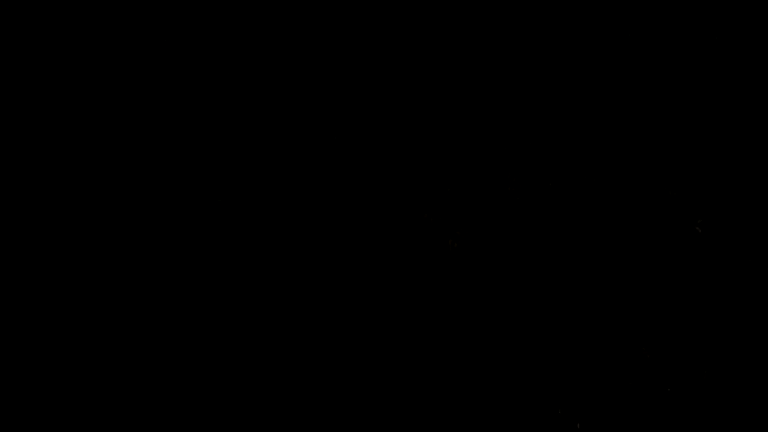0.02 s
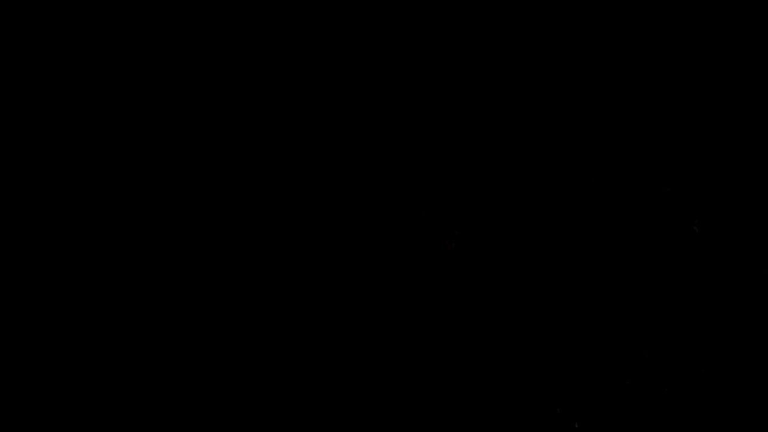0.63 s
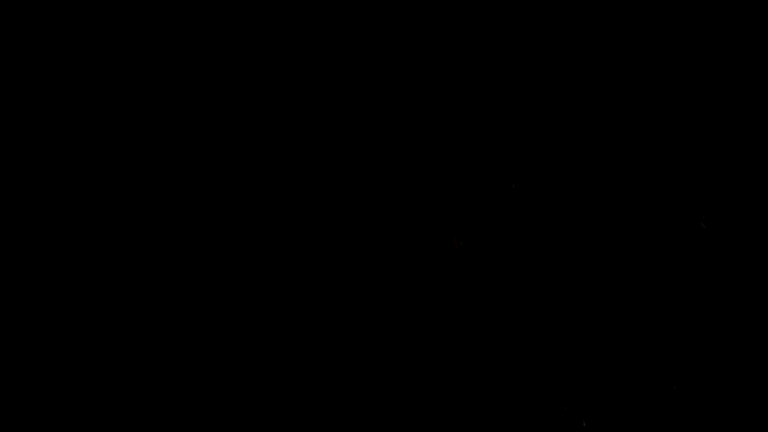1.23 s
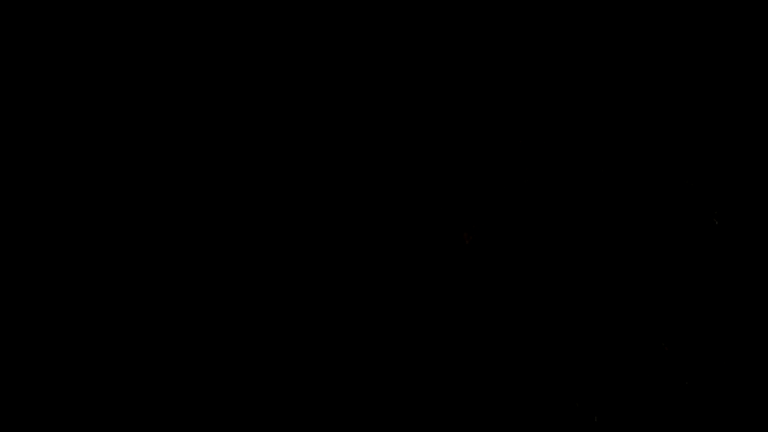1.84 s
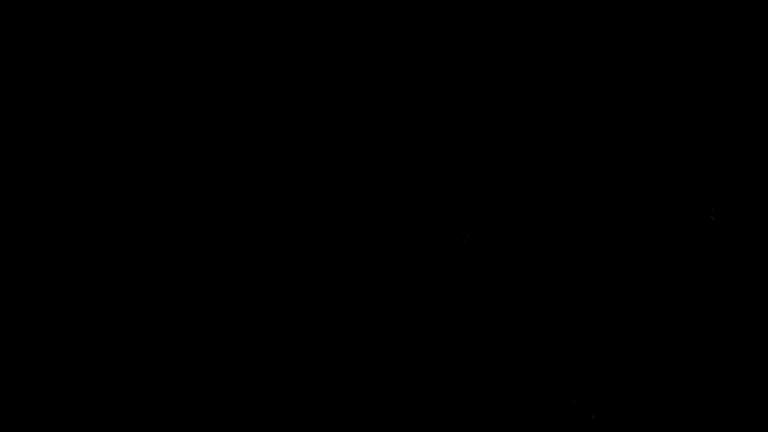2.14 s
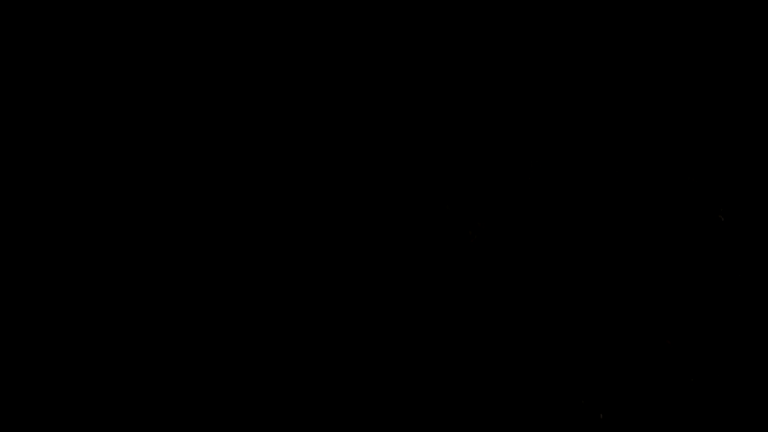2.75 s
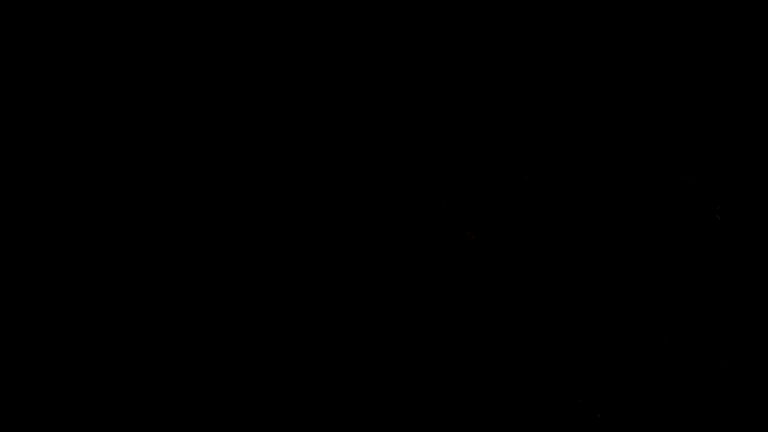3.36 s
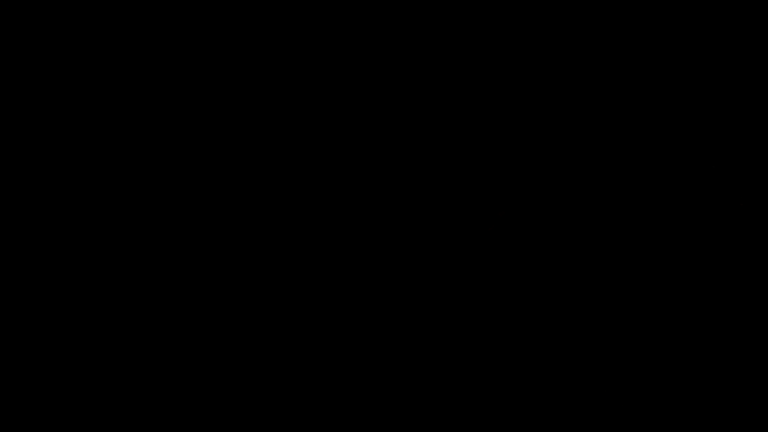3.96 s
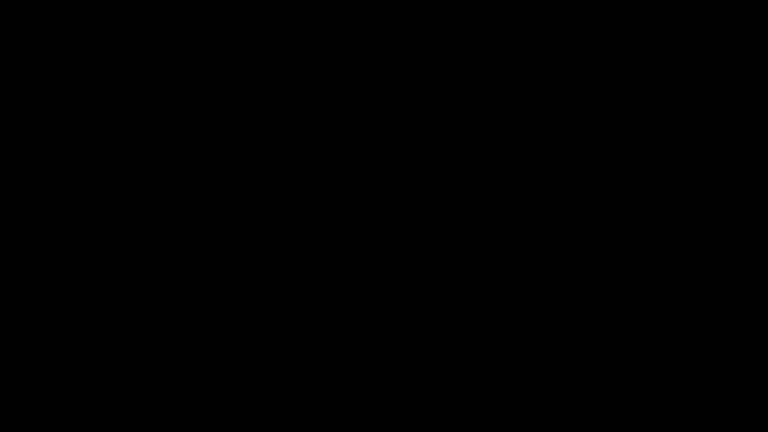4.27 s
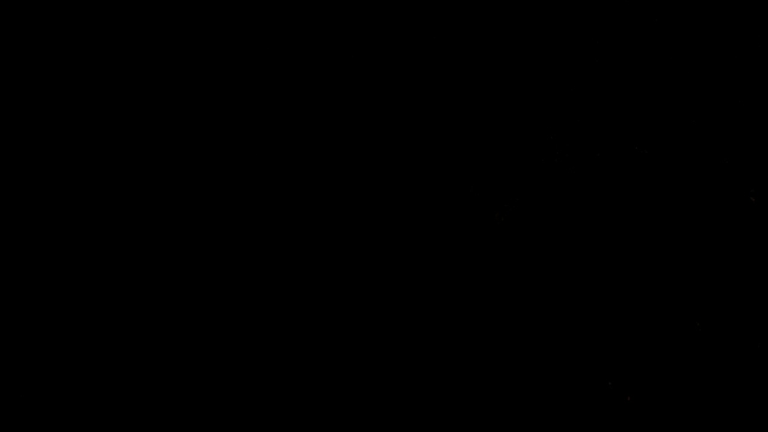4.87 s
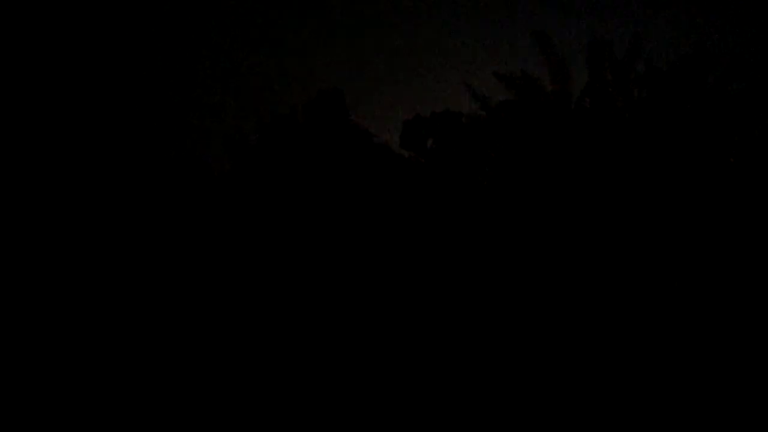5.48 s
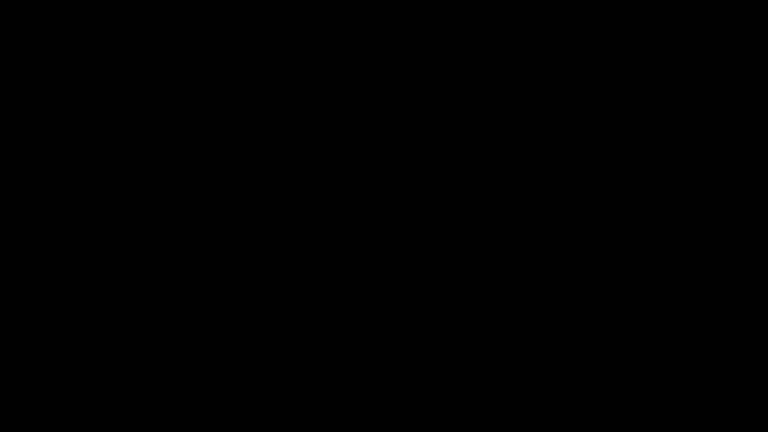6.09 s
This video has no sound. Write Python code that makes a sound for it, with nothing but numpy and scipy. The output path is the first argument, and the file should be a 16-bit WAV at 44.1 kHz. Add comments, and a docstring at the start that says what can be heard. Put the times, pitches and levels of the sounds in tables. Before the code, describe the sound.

Light rain falls in a garden at night for about six seconds, a steady, wide stereo hiss with fine drops ticking on nearby leaves. A faint low rumble lies underneath from the start. Between 0.3 and 1 second, close drips click, splash and plop hollowly into a puddle. At about 1.6 seconds distant thunder rolls in with low peals and short, muffled booms, the strongest cluster coming around 2.5 to 2.9 seconds. Single bright drips continue throughout, with small splashes near 1.8, 3.1 and 3.4 seconds and a plop near 3.1. The thunder thuds again at 4.2 seconds, then grows fuller and nearer, with a long peal and several booms from 4.9 to 5.7 seconds. Two close splashes with sharp drips and plops land around 5.9 to 6 seconds, while the rain and thunder are still going.

```python
"""Light night rain in a garden, while distant thunder rolls in and slowly draws nearer.
Countless far drops blend into a hiss, and fine drops tick on leaves. Close by, gathered water
drips, splashes and plops into a puddle. The thunder is low noise: a rumble, long peals, short booms.
Two microphone ports (small openings) pick it all up, and a stereo widener spreads it out."""
import sys
import numpy as np
from scipy import signal
from scipy.fft import rfft, irfft
from scipy.io import wavfile
from scipy.ndimage import uniform_filter1d

SR = 44100
rng = np.random.default_rng(int(sys.argv[2]) if len(sys.argv) > 2 else 0)


def to_wav(s):
    """Save 16-bit WAV."""
    ch = np.atleast_2d(s).T  # columns
    pcm = np.round(np.clip(ch, -1, 1) * 32767)  # PCM
    wavfile.write(sys.argv[1], SR, pcm.astype(np.int16))


N = 269451
T = np.arange(N) / SR
HZ = np.fft.rfftfreq(N, 1 / SR)

# Levels are relative. A t60 is the time a sound takes to fade by 60 dB.
# tone of far and of nearer thunder: f/Hz, level/dB
FAR_TONE = [(25, -75), (55, -30), (85, -7), (130, -3.5), (200, 0.5), (280, 6.5), (400, -2.5), (600, -12.5),
            (900, -32), (2000, -88)]
NEAR_TONE = [(25, -53), (55, -37), (85, -15.5), (130, 1.5), (200, -2), (290, -2), (400, -5.5), (600, -6),
             (780, -13.5), (1100, -30), (2500, -61)]
# the unbroken rumble: t/s, level/dB, nearness/0-1
RUMBLE = [(0, -54.5, 0.34), (1.45, -52.5, 0.3), (1.7, -45.5, 0), (3.9, -42, 0.36), (4.9, -39, 0.89),
          (6.11, -36, 0.82)]
# peals of thunder: t/s at the loudest point, level/dB, t60/s, nearness/0-1
PEALS = [(1.635, -40, 2.1, 0.3), (1.93, -41.5, 1.9, 0), (2.54, -36, 1.6, 0.04), (2.8, -37.5, 1.5, 0.36),
         (3.42, -41, 1.2, 0.6), (3.59, -39, 0.79, 1), (4.1, -42, .5, 0.3), (4.19, -31.5, 0.4, 0.9),
         (4.46, -40, 0.93, .95), (4.87, -34, 4.7, 0.47), (5.11, -37.5, 0.56, 0.4), (5.38, -33, 3.1, 0.8),
         (5.73, -38, 1.1, 1)]
# booms within the thunder: t/s at the loudest point, level/dB, f/Hz, width/octaves, length/s
BOOMS = [(1.613, -28, 290, 0.36, 0.058), (1.622, -44, 76, .36, .1), (1.653, -31, 233, .5, 0.053),
         (1.71, -42, 110, .5, 0.16), (1.867, -48, 80, .3, 0.16), (2.016, -30, 285, 0.28, 0.058),
         (2.423, -30, 312, 0.85, 0.048), (2.55, -24.5, 300, 0.65, .065), (2.694, -18, 261.5, 0.29, 0.045),
         (2.746, -25.5, 210, 0.21, 0.064), (2.8, -34, 217, .5, 0.095), (2.81, -51, 70, .35, .08),
         (2.87, -26.5, 250, 0.51, 0.068), (3.415, -35, 124, 0.28, .08), (4.186, -23.5, 141, 0.28, 0.052),
         (4.228, -30, 310, 0.74, 0.048), (4.394, -30.5, 282, .3, 0.059), (4.577, -29, 278, .3, .045),
         (4.617, -28, 155, 0.43, .07), (5.117, -25, 308, 0.22, 0.053), (5.143, -34.5, 135, 0.3, 0.0603),
         (5.191, -24.5, 146, 0.25, .05), (5.358, -25.5, 210, 0.29, 0.0507), (5.384, -29, 137, .32, .055),
         (5.399, -27.5, 207, 0.54, .05), (5.409, -31.5, 620, 0.33, 0.048), (5.468, -28.5, 304, .25, 0.074),
         (5.555, -30.5, 138, .45, .05), (5.581, -28, 340, 0.51, 0.051), (5.718, -46, 82, .28, .11),
         (5.725, -31, 560, 0.57, 0.048), (5.975, -30, 155, 0.34, .05)]
# tone of the far rain: f/Hz, level/dB
RAIN_TONE = [(30, -66), (70, -22), (140, -6.5), (370, 0.5), (550, -1), (750, 0.5), (1050, -3), (1450, -7.5),
             (2200, -3), (2800, -3.5), (3600, -6), (4500, -11), (7500, -9.5), (11000, -10.5), (14000, -19),
             (15500, -17)]
# strength of the far rain: t/s, level/dB
RAIN_LEVEL = [(0, -37), (.7, -37.5), (1.2, -37.5), (1.8, -37), (2.25, -37.5), (2.7, -37), (3.3, -38),
              (3.8, -38), (4.3, -37.5), (5.1, -37), (5.7, -38.5), (6.11, -37.5)]
# hollow plops in a puddle: t/s, level/dB, f/Hz, t60/s
PLOPS = [(.556, -39, 875, .1), (.574, -29, 757, 0.12), (.604, -40, 896, .1), (.606, -38, 1165, .1),
         (1.02, -32.5, 770, 0.073), (3.148, -36, 634, 0.083), (3.166, -33, 803, 0.1),
         (3.168, -28.5, 617, 0.08), (5.916, -27, 3490, 0.033), (5.926, -37, 3180, 0.045),
         (5.988, -43, 2150, .05), (5.993, -33, 680, 0.068)]
# splashes: t/s, spray level/dB, spray tilt/dB per octave, spray t60/s, slap level/dB
SPLASHES = [(.402, -37.5, -6.5, 0.46, -40), (0.479, -31, -2.5, 0.37, -40), (.552, -37, -5.5, 0.35, -30.5),
            (.755, -36.5, -2, 0.25, -52), (1.824, -36, -6, 0.41, -31), (3.142, -33, -6, 0.33, -29.5),
            (3.415, -34, -8, 0.56, -31.5), (4.19, -41, -3, .3, -50), (4.26, -36, -3, 0.18, -55),
            (5.914, -29.5, -6, 0.26, -31.5), (5.98, -33, -6, 0.22, -31)]
# tone of a splash's spray (before its tilt) and of the puddle's slap: f/Hz, level/dB
SPRAY_TONE = [(30, -60), (120, -47), (400, -5.5), (750, -17), (1400, -27), (2300, 6.5), (3500, -2),
              (7500, 1.5), (11000, 6.5), (15500, -34)]
SLAP_TONE = [(100, -39), (350, 8.5), (700, -7), (1200, 0), (2200, -10), (3500, -13), (8000, -43)]
# the clearest drips: t/s, level/dB, f/Hz, splatter t60/s, width/octaves
DRIPS = [(0.324, -31, 10000, .014, 0.8), (.4094, -32, 8800, .03, .25), (0.4853, -20, 9100, .035, 0.4),
         (0.4985, -28, 4600, .12, 0.9), (.529, -31, 9400, .025, .3), (0.5525, -29, 6000, .06, .9),
         (0.6713, -21.5, 7200, 0.043, 0.85), (1.028, -26.5, 11000, .04, 1.2),
         (1.4207, -32, 3700, .03, 0.54), (1.4675, -30, 7500, .025, .4), (2.0655, -30.5, 9800, .03, .5),
         (2.263, -26.5, 9800, 0.016, .65), (2.421, -31, 7540, .025, 0.73), (2.5943, -32, 9400, .02, .5),
         (3.146, -27.5, 6400, .04, 0.45), (3.416, -31, 9000, .05, .8), (3.495, -29.5, 9000, .03, .25),
         (3.506, -31, 9500, .3, .7), (3.5203, -31.5, 7200, .18, 0.65), (3.953, -28.5, 7300, 0.033, 0.59),
         (3.9887, -32, 7000, .025, .35), (4.131, -33.5, 3770, .045, .5), (4.2, -32, 9400, .04, 0.32),
         (4.262, -32, 11200, 0.2, 0.34), (4.4428, -31, 9000, .05, 1), (4.6435, -30, 7800, .025, .6),
         (4.7537, -24, 9000, .025, 0.98), (5.3305, -30, 9000, 0.046, 0.53),
         (5.5525, -25.5, 5860, 0.12, 1.2), (5.555, -34, 6200, .06, 0.65), (5.9138, -23, 10800, 0.075, 0.8),
         (5.9157, -27, 4600, .08, 1.1), (5.9165, -34, 2700, .07, .7), (5.9205, -27, 6000, .05, 1.1),
         (5.979, -29, 8400, .1, .9), (5.9855, -31, 6200, .05, 0.55)]
# strength of the side (left minus right) against the mid (left plus right): f/Hz, level/dB
SIDE_LEVEL = [(30, 12), (130, -7.5), (280, -8), (600, -7), (1000, -6), (1500, 6.5), (2500, -1.5),
              (16000, 1)]
# how much of the side comes from one direction: f/Hz, weight/0-1
SIDE_DIRECT = [(50, 0.58), (250, 1), (600, .25), (1100, .3), (2000, 0.63), (3400, .62), (4600, .35),
               (7000, .1), (10000, 0.2), (16000, .25)]
# how much louder the left port is than the right: f/Hz, level/dB
BALANCE = [(100, 0.5), (250, 0), (550, -2), (850, -2.5), (1300, 0.5), (16000, 0.4)]
# how the ports colour the sound: f/Hz, level/dB
PORT_TONE = [(3650, 0), (4100, -3), (4550, -2.8), (4950, -7.5), (5550, -7.5), (5800, .3), (6100, -2),
             (7200, .8), (8200, -.4), (12500, -.5), (14000, .8)]


def gain_of(db):
    """Turns decibels into a factor to multiply by."""
    return 10 ** (np.asarray(db) / 20)


def evened(x):
    """Scales a signal to an average strength (rms) of 1."""
    return x / np.sqrt(np.mean(x ** 2) + 1e-20)


def read(table, hz):
    """Looks up a table by frequency, sliding between its rows on a pitch scale."""
    f, value = np.transpose(table)
    return np.interp(np.log(hz + 1), np.log(f + 1), value)


def add(mix, s, sound):
    """Lays a two-channel sound into the mix at s seconds."""
    part = mix[:, max(round(s * SR), 0):][:, :sound.shape[1]]
    part += sound[:, :part.shape[1]]


def noise(tone, size):
    """Two unrelated noises; tone gives the level in dB for each frequency."""
    white = rfft(rng.standard_normal((2, size)))
    return evened(irfft(white * gain_of(tone(np.fft.rfftfreq(size, 1 / SR))), size))


def hump(centre_hz, octaves):
    """A bell-shaped tone, 10 dB down that many octaves from its centre."""
    return lambda hz: -10 * (np.log2((hz + 1) / centre_hz) / octaves) ** 2


def drift(low_hz, high_hz):
    """A random wobble made of 20 slow waves."""
    t = T[::128]
    waves = (np.sin(2 * np.pi * (f * t + rng.random())) / np.sqrt(f)
             for f in np.geomspace(low_hz, high_hz, 20))
    return np.interp(T, t, evened(sum(waves)))


def peal(s, db, t60, rise_s=0.068):
    """Loudness of one peal of thunder: a quick swell, then an even fade."""
    return gain_of(db - 10 * (np.minimum(T - s, 0) / rise_s) ** 2 - 60 * np.maximum(T - s, 0) / t60)


def thunder_roll(level_db=0.58, lumps_db=1.0):
    """Sound from along the lightning's path arrives in peals over a rumble; nearer parts are fuller."""
    s, db, nearness = np.transpose(RUMBLE)
    parts = [(gain_of(np.interp(T, s, db)), np.interp(T, s, nearness))]
    parts += [(peal(*shape), share) for *shape, share in PEALS]
    near_gain = np.sqrt(sum(gain ** 2 * share for gain, share in parts))
    far_gain = np.sqrt(sum(gain ** 2 * (1 - share) for gain, share in parts))
    far = far_gain * noise(lambda hz: read(FAR_TONE, hz), N)
    near = near_gain * noise(lambda hz: read(NEAR_TONE, hz), N)
    return (far + near) * gain_of(level_db + lumps_db * drift(6.9, 35))


def thunder_booms(level_db=-4, echo_db=-13, echo_t60=0.3):
    """Bends in the lightning send thuds, blurred by distance; the land scatters each into an echo."""
    t, out = np.arange(16384) / SR, np.zeros((2, N))
    for s, db, hz, width, length in BOOMS:
        swell = np.sin(np.pi * np.minimum(t / length, 1)) ** 2
        thud = noise(hump(hz, width), len(t)) * swell
        thud *= np.linalg.norm(swell) / np.linalg.norm(thud, axis=1, keepdims=True)  # set its energy
        fade = gain_of(echo_db - 60 * np.maximum(t - length, 0) / echo_t60)
        echo = np.minimum(t / length, 1) ** 2 * fade * noise(hump(hz, width), len(t))
        add(out, s - length / 2, gain_of(db + level_db) * (thud + echo))
    return out


def rain_hiss(swell_db=0.73, patch_db=1.47):
    """Countless far drops merge into a hiss that swells a little and shifts its tone in patches."""
    grid = signal.stft(noise(lambda hz: read(RAIN_TONE, hz), N), nperseg=1024)[2]
    patches = rng.standard_normal(grid.shape[1:])
    for axis in (0, 1):  # smooth over frequency, then over time
        patches = uniform_filter1d(patches, size=6, axis=axis)
    hiss = signal.istft(grid * gain_of(patch_db * evened(patches)), nperseg=1024)[1][:, :N]
    level_db = np.interp(T, *np.transpose(RAIN_LEVEL)) + swell_db * drift(2.2, 25)
    return gain_of(level_db) * evened(hiss)


def leaves(per_s, spread_db, low_hz, high_hz, t60, octaves, count=32):
    """Drops of unequal size land at random; each leaf answers with its own short tick."""
    t, out = np.arange(2048) / SR, np.zeros((2, N))
    for leaf_hz in np.linspace(low_hz, high_hz, count):
        tick = noise(hump(leaf_hz, octaves), len(t)) * gain_of(-60 * t / t60)
        strength = gain_of(spread_db * np.minimum(rng.exponential(1, N), 3.6))
        hits = strength * (rng.random(N) < per_s / count / SR)
        out += signal.oaconvolve(hits[None], evened(tick), axes=1)[:, :N]  # one tick for each hit
    return evened(out)


def drizzle(fine_db=-54.5, broad_db=-49.5):
    """Fine drops tick brightly on nearby leaves; larger ones make broad leaves ring briefly, lower."""
    fine = leaves(per_s=470, spread_db=7.5, low_hz=3870, high_hz=13900, t60=0.0081, octaves=1.0)
    broad = leaves(per_s=160, spread_db=2.5, low_hz=1233, high_hz=8590, t60=0.082, octaves=0.11)
    return gain_of(fine_db) * fine + gain_of(broad_db) * broad


def plops(rise_s=0.002, glide=0.25):
    """The pocket of air under a heavy drop rings and rises slightly in pitch."""
    t, out = np.arange(8192) / SR, np.zeros((2, N))
    for s, db, hz, t60 in PLOPS:
        ring = np.sin(2 * np.pi * (hz * t * (1 + glide * t) + rng.random((2, 1))))
        add(out, s, ring * (1 - np.exp(-t / rise_s)) * gain_of(db - 60 * t / t60))
    return out


def splashes(rise_s=0.00024, clump_db=3, slap_rise_s=0.011, slap_t60=0.28, slap_gain_db=-7):
    """Gathered water bursts into clumps of bright droplets; the puddle's hollow slap comes just after."""
    t, out = np.arange(16384) / SR, np.zeros((2, N))
    for s, db, tilt_db, t60, slap_db in SPLASHES:
        spray = noise(lambda hz: read(SPRAY_TONE, hz) + tilt_db * np.log2(1 + hz / 500), len(t))
        flicker = evened(uniform_filter1d(rng.standard_normal(len(t)), size=90))
        clumps = evened(gain_of(clump_db * flicker))
        add(out, s, spray * clumps * (1 - np.exp(-t / rise_s)) * gain_of(db - 60 * t / t60))
        slap = noise(lambda hz: read(SLAP_TONE, hz), len(t)) * np.minimum(t / slap_rise_s, 1)
        fade_db = 60 * np.maximum(t - slap_rise_s, 0) / slap_t60
        add(out, s, slap * gain_of(slap_db + slap_gain_db - fade_db))
    return out


def drips(level_db=-2, splatter_db=-11, click_share=0.27, click_t60=0.003, snap_t60=0.013,
          faint_per_s=1.5, faint_db=-33.5, faint_hz=8600, faint_t60=0.04, faint_octaves=0.76):
    """A close drip lands with one hard click and a snap; a weaker splatter of droplets follows."""
    t, out = np.arange(8192) / SR, np.zeros((2, N))
    onset = 1 - np.exp(-t / 0.0002)
    click_shape = gain_of(-60 * t / click_t60)
    snap_shape = onset * gain_of(-60 * t / snap_t60)
    # fainter drips fall at random times, each up to 0.2 octaves higher or lower
    faint = [(when * N / SR, faint_db, faint_hz * 2 ** (0.2 * (2 * pitch - 1)), faint_t60, faint_octaves)
             for when, pitch in rng.random((round(faint_per_s * N / SR), 2))]
    for s, db, hz, t60, width in DRIPS + faint:
        fizz = noise(hump(hz, width), len(t))
        click = np.sqrt(click_share) * evened(click_shape * fizz)
        snap = np.sqrt(1 - click_share) * evened(snap_shape * fizz)
        impact = evened(click + snap) * snap_shape.std()
        splatter = fizz * onset * gain_of(splatter_db - 60 * t / t60)
        add(out, s, gain_of(db + level_db) * (impact + splatter))
    return out


def scene():
    """Rain and thunder reach two ports that sit close together, one left and one right."""
    water = rain_hiss() + drizzle() + drips() + splashes() + plops()
    mid, scattered = rfft(water + thunder_roll() + thunder_booms())
    direct = read(SIDE_DIRECT, HZ)
    # sound from one direction puts the side a quarter cycle (1j) ahead of the mid
    side = gain_of(read(SIDE_LEVEL, HZ)) * (1j * direct * mid + np.sqrt(1 - direct ** 2) * scattered)
    lean = gain_of(read(BALANCE, HZ) / 2)
    return irfft(np.array([(mid + side) * lean, (mid - side) / lean]), N)


def record(dry, notch_spacing_hz=2600, notch_width=0.42, top_hz=15780):
    """The ports colour the sound, the widener spreads it, and the highest treble is cut off."""
    left, right = rfft(dry) * gain_of(read(PORT_TONE, HZ))
    # the widener hands bands of treble to mid and side in turn, like the teeth of two combs
    angle = np.pi * HZ / notch_spacing_hz
    mid_comb, side_comb = (c * np.tanh((c / notch_width) ** 2) for c in (np.sin(angle), np.cos(angle)))
    total = np.hypot(mid_comb, side_comb)  # dividing by this keeps the combs' joint power even
    bass = angle < np.pi / 2  # below the first notch the sound is not widened
    mid = (left + right) / 2 * np.where(bass, 1, mid_comb / total)
    side = (left - right) / 2 * np.where(bass, np.tanh(4 * abs(side_comb)), side_comb / total)
    wide = irfft(np.array([mid + side, mid - side]), N)
    treble_cut = signal.firwin(1023, top_hz, window=("kaiser", 9), fs=SR)
    return signal.oaconvolve(wide, treble_cut[None], "same")


dry = scene()
out = record(dry)
to_wav(out)
```